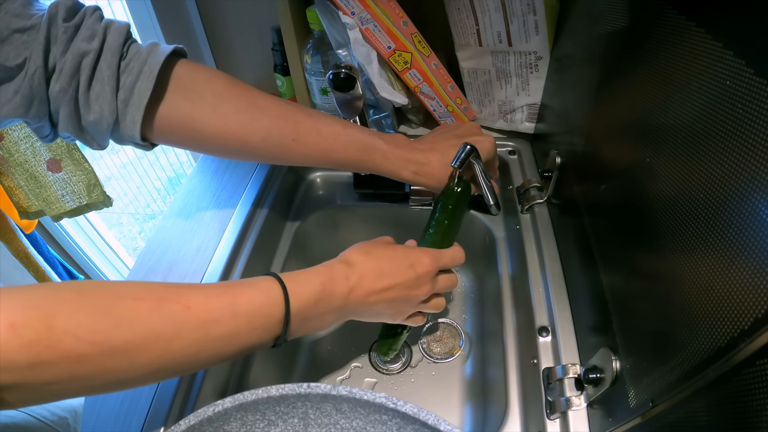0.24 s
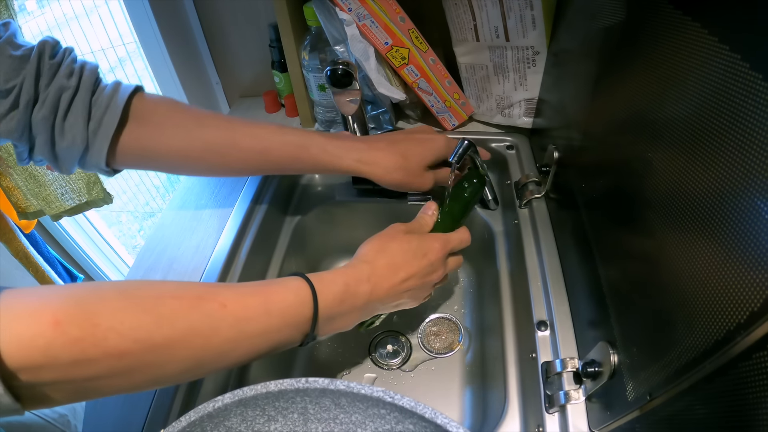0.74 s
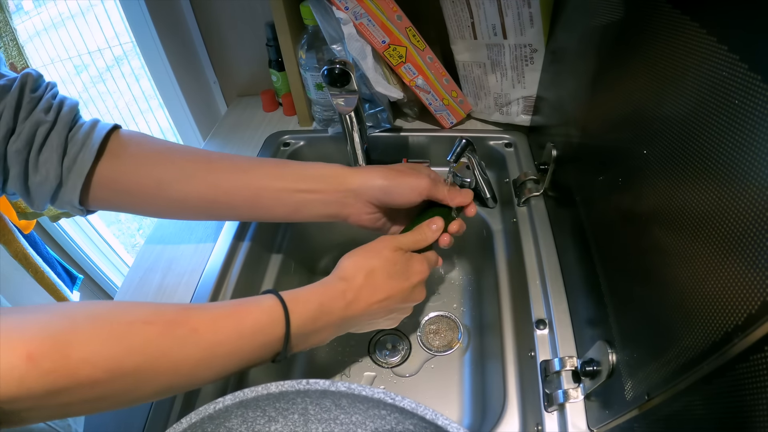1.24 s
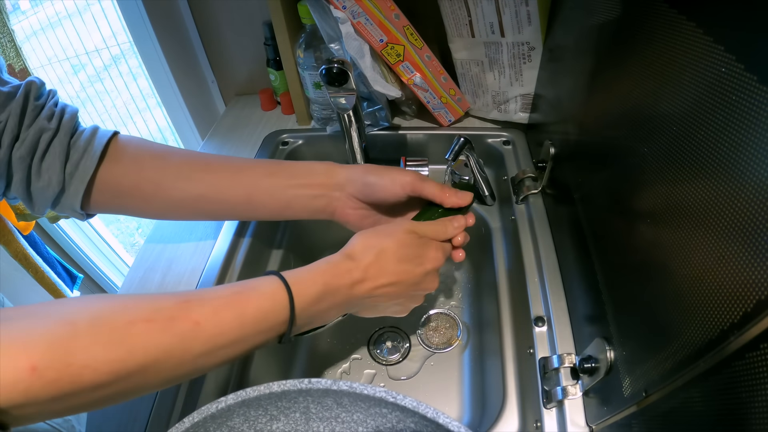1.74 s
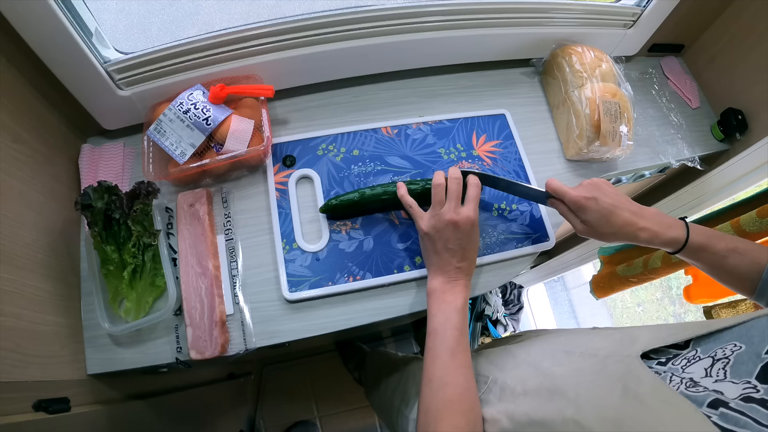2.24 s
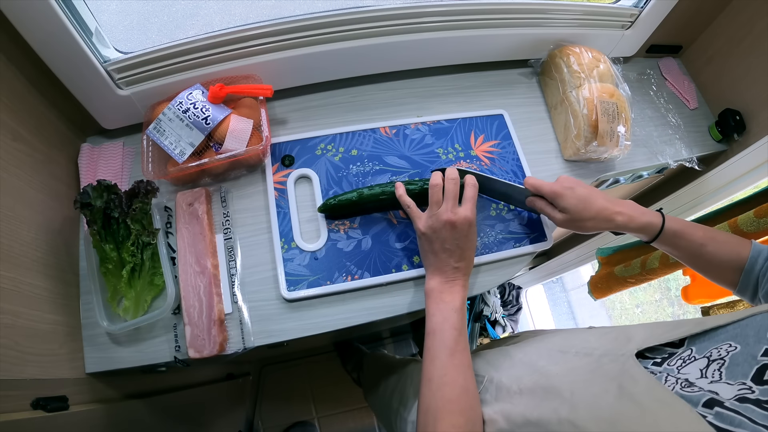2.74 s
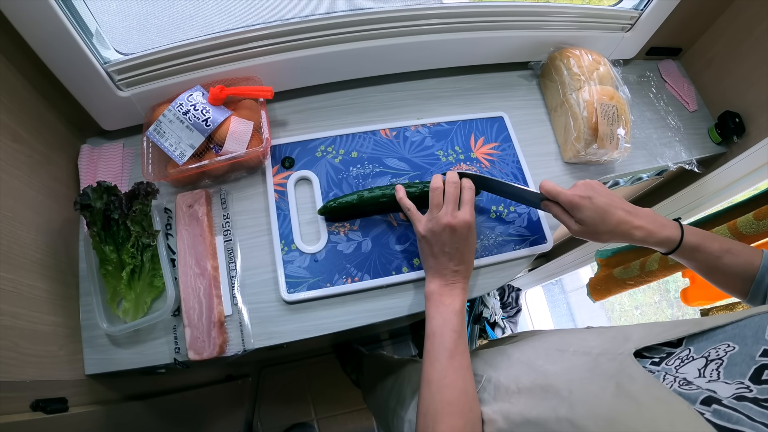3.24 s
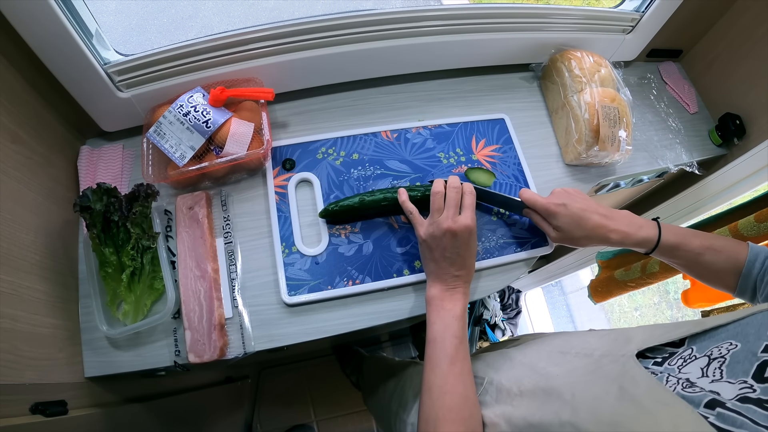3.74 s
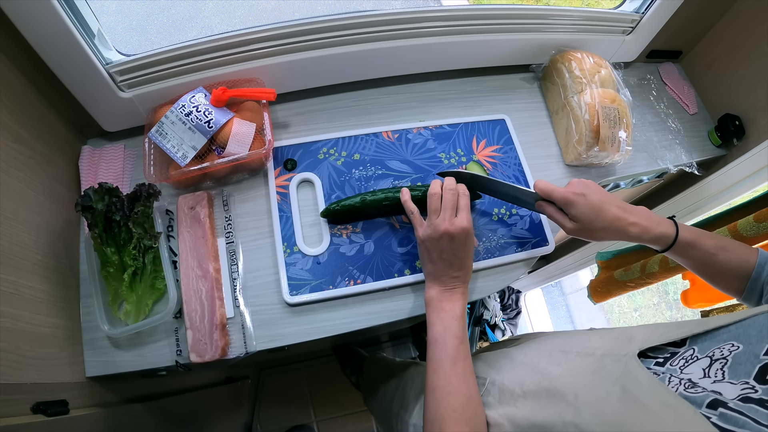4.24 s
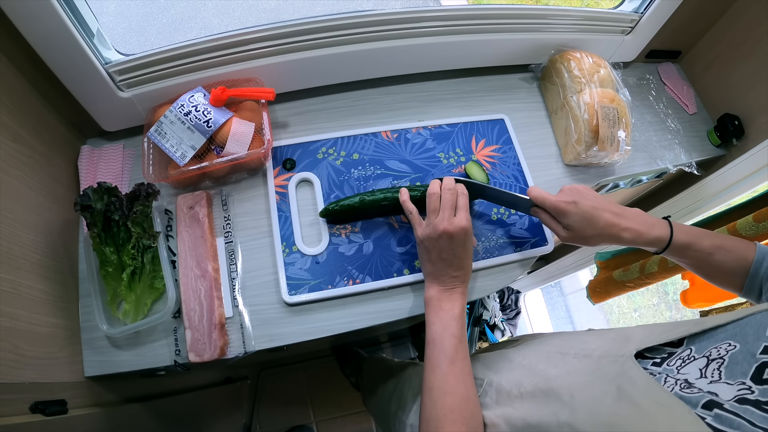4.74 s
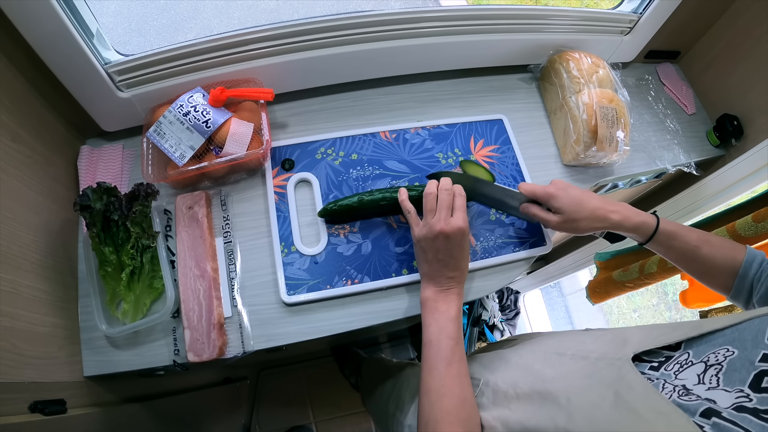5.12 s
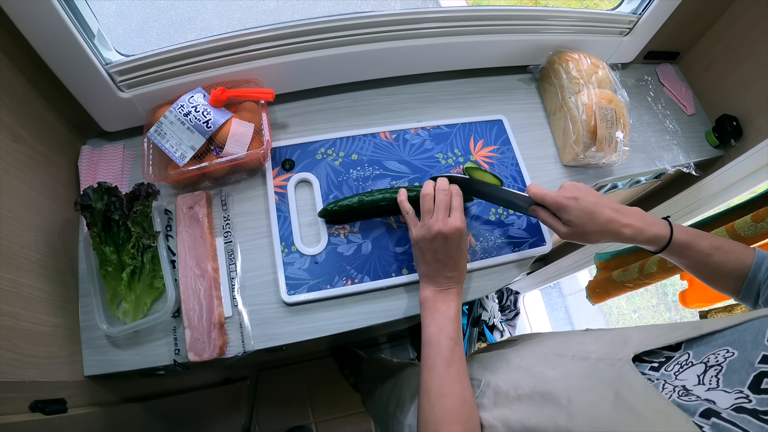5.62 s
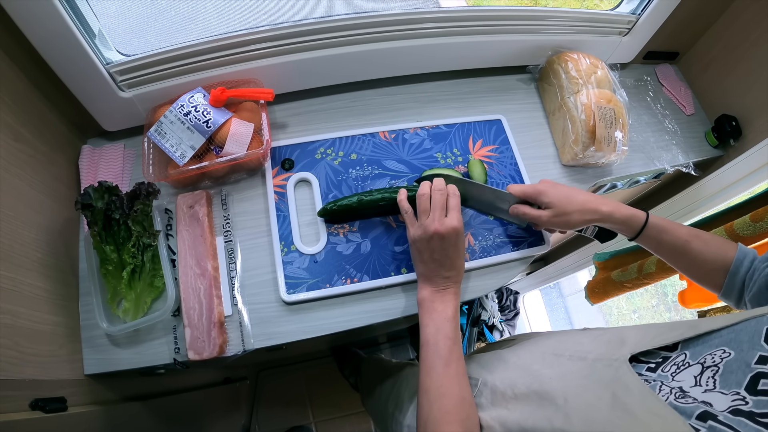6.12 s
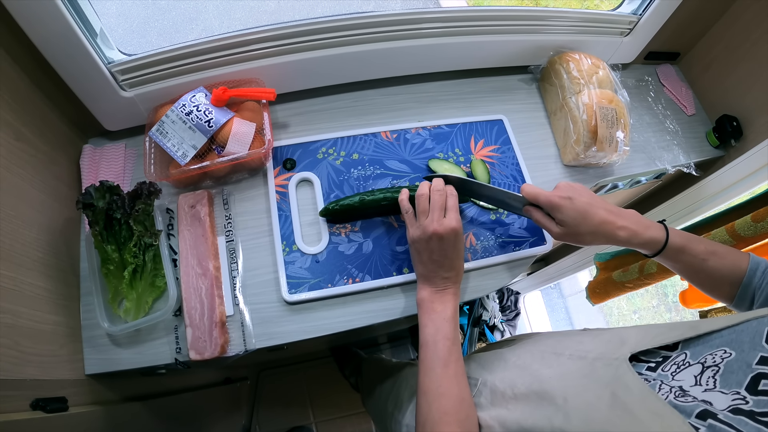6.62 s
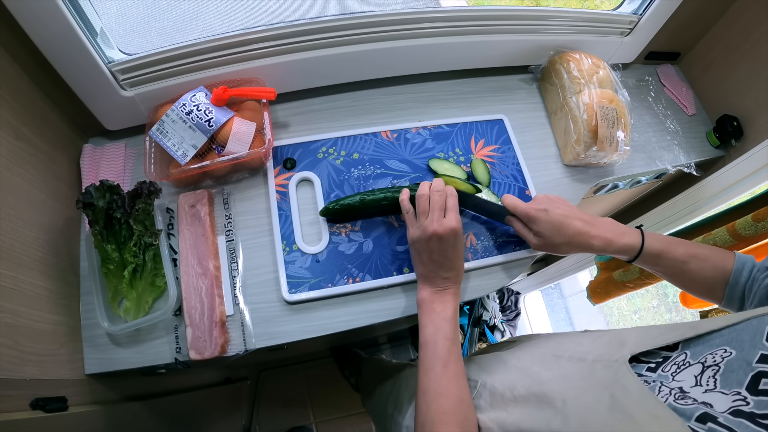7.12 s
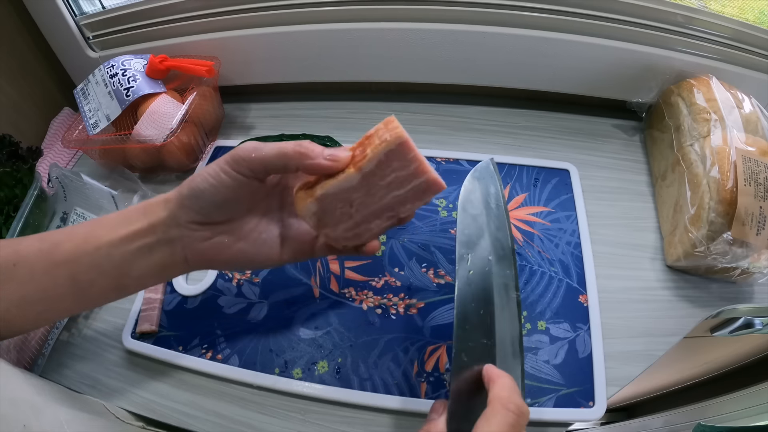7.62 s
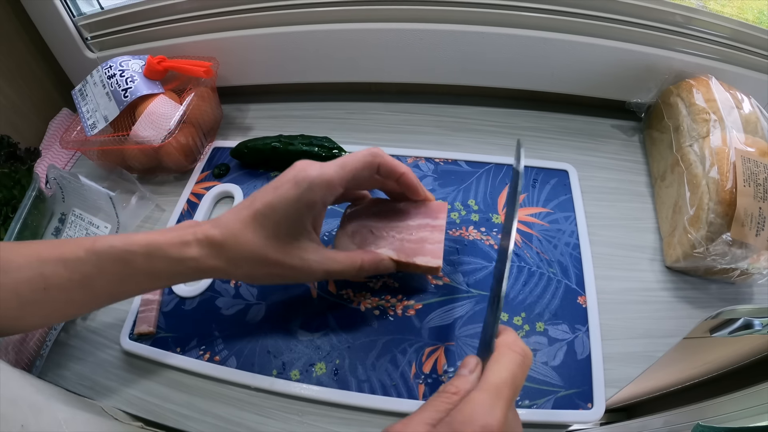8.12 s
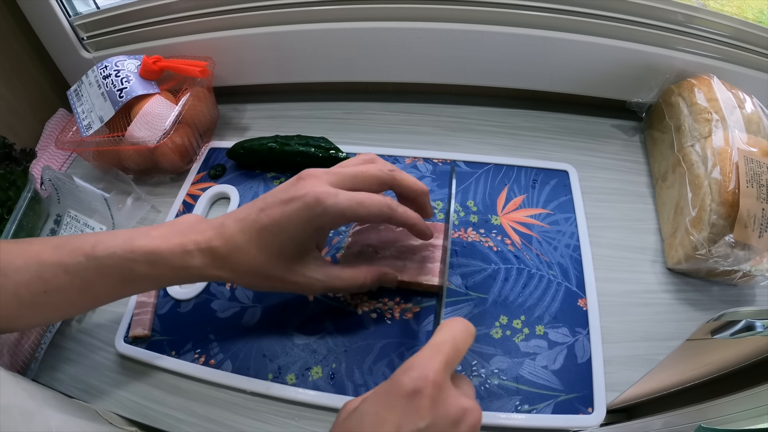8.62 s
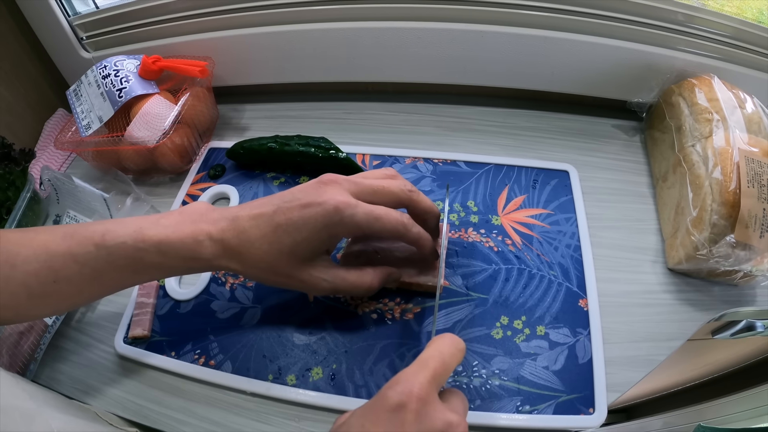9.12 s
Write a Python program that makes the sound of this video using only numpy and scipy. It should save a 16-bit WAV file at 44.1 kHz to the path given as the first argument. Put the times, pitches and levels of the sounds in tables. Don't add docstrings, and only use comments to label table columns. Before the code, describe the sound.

Running water hisses and drums in a metal basin over a steady pump hum, broken by hands and splats. It dies away as the first cut lands. Five close, dry chops follow about a second apart, each led by a juicy slide and tearing skin, with small knocks of falling slices between. Afterwards come soft handling and a block of meat set down, distant sparrows chirping and swelling street air, in a short, boxy room.

```python
import sys
import numpy as np
from scipy import signal
from scipy.fft import rfft, irfft, next_fast_len
from scipy.io import wavfile
from scipy.ndimage import uniform_filter1d, map_coordinates

SR = 44100
rng = np.random.default_rng(int(sys.argv[2]) if len(sys.argv) > 2 else 0)


def magnitude_from_level(level_db):
    exponent = np.asarray(level_db, float) / 20
    return 10 ** exponent


def int16_out(signal):
    q = np.round(np.clip(np.atleast_2d(signal).T, -1, 1) * 32767)
    wavfile.write(sys.argv[1], SR, q.astype(np.int16))


N = 412335

# frequency in Hz, density in dB per Hz.
RUMBLE_SPECTRUM = [(12, -31.5), (20, -3), (32, -1.5), (42, -4), (70, -1), (97, -14), (107, -12), (111, -12),
                   (120, 2.5), (160, -33), (260, -120)]
# frequency in Hz, density in dB per Hz.
HUM_SPECTRUM = [(59, -55.5), (100, -21), (121, -9.5), (140, -3.5), (157, 3), (167, -9.5), (199, -14),
                (372, -20), (409, -19.5), (600, -38), (800, -50), (1040, -75), (1760, -120)]
# frequency in Hz, density in dB per Hz.
AIR_SPECTRUM = [(350, -44), (600, -14), (911, -11.5), (1030, -4.5), (1230, -2), (1380, -4), (1500, -2.5),
                (1890, -9.5), (2900, -17.5), (3600, -13.5), (7400, -16), (8500, -24.5), (11900, -32),
                (13500, -46), (15000, -50.5)]
# frequency in Hz, side minus mid in dB.
SIDE_SPREAD = [(60, -22), (110, -38.5), (200, -18.5), (380, -18), (700, -11), (1290, -9), (2380, -4.5),
               (4400, -8.5), (8120, -9), (15000, -10.5)]
# time in seconds, hiss in dB, low drone in dB.
BACKGROUND_COURSE = [(0, -2, -4.5), (3.3, -1, -4), (3.7, -1, 8.5), (4.2, -1.5, -0.5), (5.2, -3, -6), (5.6, 2, -3),
                     (6.1, 4.5, 5), (6.4, -1, -5), (6.8, 2.5, 1), (7.3, 3, -2), (7.8, 2, -6), (8.25, 9.5, 8.5),
                     (8.55, 8, 10.5), (8.9, 9, 5.5), (9.4, 8.5, 4)]
RUMBLE_DB, HUM_DB, AIR_DB = -52.5, -53.5, -79.5
RUMBLE_FOLLOWS, HUM_FOLLOWS = 0.27, 0.37
# frequency in Hz, t60 in seconds.
WALL_T60 = [(100, 0.12), (400, 0.064), (1500, 0.047), (5000, 0.11), (12000, 0.056)]

# start in seconds, level in dB, centre in Hz.
CHEEPS = [
    (3.22, -61, 4197),
    (4.531, -58, 4290),
    (5.678, -60.5, 4300),
    (7.642, -60, 4270),
]
# start in seconds, level in dB, centre in Hz.
CHIPS = [(7.334, -69, 4250), (7.979, -67, 4470), (8.047, -65, 4350), (8.368, -68, 4300),
         (8.438, -65.5, 4100), (8.733, -71.5, 4250), (8.792, -68, 4170), (8.861, -62, 4230)]
# start in seconds, level in dB, centre in Hz.
TRILL = [(7.835, -73.5, 4920), (7.853, -74, 4800), (7.885, -66, 4660), (7.902, -61, 4550),
         (7.922, -61.5, 4200)]
# length in seconds, fall in Hz.
CALL_SHAPES = [
    (0.081, 2000),
    (0.0298, 370),
    (0.018, 980),
]

# time in seconds, level in dB, stream broken by the hands in dB.
TAP_COURSE = [
    (0, 0.5, -1.5),
    (.33, 0.5, -2),
    (.65, 1, 3),
    (1.01, 1, -1),
    (1.35, 0.5, -0.8),
    (2.17, -0.5, 1.1),
    (2.56, -1, 1),
    (2.76, -11, 1),
    (2.87, -16, -2),
    (3.0, -40, -2.5),
]
# frequency in Hz, density in dB per Hz.
SPRAY_SPECTRUM = [(590, -22.5), (1000, 3), (1270, -8.5), (1570, -2), (1970, -9.5), (2970, -8.5),
                  (4780, -6.5), (7600, -13), (8400, -19), (13200, -21), (14300, -46)]
# frequency in Hz, density in dB per Hz.
SPLASH_SPECTRUM = [(120, -38), (200, 2.5), (232, -18), (285, -4.5), (344, -14.5), (436, -6), (549, -11.5),
                   (712, -23.5), (806, -26), (820, -13.5), (1070, -50.5), (1800, -120)]
# centre in Hz, width in Hz, level in dB.
STEEL_MODES = [(1517, 43, -3.5), (3170, 510, -1), (3790, 83, -4.5), (4120, 170, -6), (4870, 210, -15.5),
               (5560, 74, -6), (6160, 79, -7), (7700, 74, -10)]
PUMP_HZ = 172.3
PUMP_DB, SHAKE_DB, BASIN_DB, SPLASH_DB, SPRAY_DB = -40, -47.5, -43, -50.5, -59
BASIN_CHURNS, SPRAY_CHURNS = 2.2, 0.6
BASIN_FADES, SPRAY_FADES = 0.6, 0.94

# start in seconds, peak in dB, knuckle in dB.
THUMPS = [(0.048, -27.5, -39), (0.604, -30, -21), (0.714, -20, -16), (0.972, -17.5, -12.5),
          (1.369, -16.5, -25), (1.409, -27.5, 6), (1.903, -20, -32), (2.165, -24, -17)]
# start in seconds, peak in dB, brightness in dB.
SLAPS = [(0.4693, -36.5, 8), (0.5064, -46, -2), (0.6487, -42, -8.5), (0.6717, -34, 4), (0.7238, -34, 2),
         (0.7393, -16, 0), (0.971, -50.5, -9), (2.168, -66, -9)]
# start in seconds, peak in dB, brightness in dB.
SMACKS = [(0.707, -35, -8), (1.0075, -14, -5), (1.2104, -39, 4), (1.382, -38, 7), (1.4106, -35, 11.5),
          (1.6486, -18, -1), (2.4477, -28, -9), (2.5262, -33, 1.5)]
# body in dB, fizz in dB, t60 in seconds.
WET_CONTACTS = [
    (10, -14.5, 0.06),
    (-15.5, -22, .065),
]
# start in seconds, peak in dB, centre in Hz.
SPITS = [(.138, -46, 5460), (.193, -45, 5400), (.418, -54.5, 11500), (0.4509, -42.5, 7700),
         (0.46, -51.5, 11510), (.635, -54, 10500), (.672, -51.5, 9000), (0.9237, -40.5, 6940),
         (.978, -51.5, 9600), (.989, -53, 11910), (1.281, -40.5, 5660), (1.295, -54, 11980),
         (1.312, -52, 9800), (1.3302, -44, 5070), (1.413, -44.5, 10500), (1.4606, -44, 5800),
         (1.5235, -47, 7000), (1.6291, -35, 6460), (1.63, -48.5, 12000), (1.8259, -49, 8000),
         (1.884, -41.5, 4100), (2.0984, -42, 6700), (2.244, -52.5, 11470), (2.279, -48, 10500),
         (2.3065, -28.5, 6940), (2.3063, -43, 11560), (2.3476, -43.5, 5820), (2.389, -54.5, 11000),
         (2.4283, -43, 7360), (2.43, -50.5, 10980), (2.725, -32.5, 6200), (2.7251, -45.5, 11040),
         (2.7707, -48.5, 9700), (2.813, -59.5, 12000), (2.826, -59.5, 8000)]
THUMP_T60, KNUCKLE_HZ = 0.14, 389

# start in seconds, thud peak in dB, hardness in dB,
# wetness in dB, knock in Hz.
KNOCKS = [(3.217, -46.5, -14, 14, 910), (3.849, -32.5, -2.5, 0, 652), (3.876, -29, 1.5, -3, 810),
          (3.923, -27, -1.5, -11, 745), (3.98, -31, -18, -2, 700), (4.008, -41, -13, 1, 600),
          (4.024, -37, -17, 9, 600), (4.125, -54, -12, -7, 700), (4.435, -50, -6.5, 15, 900),
          (5.527, -42, -28, -2, 800), (5.541, -35.5, -13, -8, 802), (6.045, -22.5, -6, 1.5, 920),
          (6.073, -29, -7, -9, 600), (6.084, -26.5, 6.5, 5, 1120), (6.102, -29, -4.5, 5, 1900),
          (6.129, -37.5, 8.5, -2, 1110), (6.148, -33, 0, 7, 850), (6.167, -28, 10, 12, 1040),
          (6.187, -36, -7, 0, 600), (6.21, -38, -10, 12, 880), (6.223, -36, 5, 1, 950),
          (6.239, -36.5, -5, -1, 893), (6.503, -49, -19, 7, 1400), (7.18, -40.5, -11, -6, 596),
          (7.408, -34.5, -2, 12, 900), (7.442, -33, -4, 19.5, 953), (7.488, -47.5, -6.5, 17, 900),
          (7.503, -37.5, 3.5, 13, 1310), (7.648, -40.5, -20, 0, 912), (8.325, -39, -11.5, 6, 1296),
          (8.343, -41, -19, 7, 595)]
# start in seconds, peak in dB, centre in Hz.
PEEL_TICKS = [(4.3934, -59.5, 5630), (4.464, -59, 3295), (5.091, -64, 6740), (5.175, -70, 3700),
              (5.178, -71, 6800), (5.595, -72, 5500), (6.109, -48, 6540), (6.44, -75, 5200),
              (6.499, -66, 5290), (6.5281, -64, 6250), (6.565, -63.5, 6770), (6.588, -56.5, 5930),
              (7.173, -49, 6800), (7.2022, -43.5, 4110), (7.203, -52.5, 7530), (7.614, -62.5, 3300),
              (7.614, -63, 7950), (7.6803, -71, 7600), (8.296, -65, 8600), (8.9301, -66, 7910)]
# centre in Hz, width in Hz, level in dB.
BLADE_MODES = [(3220, 160, 0.5), (3730, 200, 1.5), (5460, 150, -1), (6250, 180, -11), (7050, 200, -3),
               (7700, 170, -3), (9100, 230, -4), (11400, 250, 3)]
# start in seconds, length in seconds, level in dB,
# centre in Hz, width in octaves.
RUBS = [(3.959, 0.18, -55.5, 437, 0.67), (4.01, 0.067, -72, 3500, .5), (4.069, .04, -77, 3180, .4),
        (6.203, 0.069, -50.5, 800, 0.61), (6.562, 0.053, -69, 6500, .8), (6.615, 0.042, -77, 5440, .6),
        (7.253, 0.077, -76.5, 6880, 0.27), (7.291, 0.052, -71, 3010, .7), (8.039, 0.094, -72.5, 4940, 0.71),
        (8.042, 0.082, -67.5, 1170, 0.86), (8.299, 0.11, -56, 340, .5)]
EDGE_DB, EDGE_HARD, EDGE_WET, TICK_DB = -18.5, 0.39, 0.66, -36.5
PEEL_T60, PEEL_BODY_DB, PEEL_THINS_DB = 0.068, -2.5, 4

# entry in seconds, bite in seconds, level in dB,
# stall at the last skin in dB, body in dB.
SLIDES = [
    (2.55, 0.074, -52, 5.5, -2.5),
    (3.382, .13, -50.5, -17, 5.5),
    (4.735, 0.055, -48.5, -1.5, 3),
    (5.761, .055, -50, 2.5, 0),
    (6.841, 0.093, -46, 2.5, -1.5),
]
# frequency in Hz, density in dB per Hz.
FLESH_SPECTRUM = [(120, -34.5), (200, -4), (304, 4), (422, -7.5), (554, 4.5), (689, -10), (755, 2.5),
                  (1090, -15), (1210, -10), (1330, -18.5), (1940, -8), (2600, -19.5), (4570, -16),
                  (7480, -28), (12000, -35), (15500, -46)]
# frequency in Hz, density in dB per Hz.
SKIN_SPECTRUM = [(180, -40), (300, -10.5), (814, 0), (1370, -4.5), (2000, 1.5), (2440, -3.5), (4390, -7),
                 (5180, -18.5), (7180, -24), (8740, -45), (15000, -57)]
# time in seconds, peak in dB, skin crunch in dB, thud in dB.
CHOPS = [
    (2.676, -6, -14.5, -1),
    (3.7667, -2.5, -8, -4),
    (4.9367, -4, -8, -6.5),
    (5.9686, -5, -13.5, -10),
    (7.0617, -7, -16, -14),
]
# low-mid modes in dB, mid modes in dB, high modes in dB, click in dB,
# tear in seconds.
LANDINGS = [
    (1.5, -6, -3, -0.5, .024),
    (-5.5, -3, 3.5, -0.5, 0.032),
    (-1, -2.5, 1, -1.5, .024),
    (3, -0.5, 1, -2, 0.023),
    (1.5, -1, -1, 1.5, 0.025),
]
# centre in Hz, width in Hz, level in dB.
BOARD_MODES = [(266, 110, -3), (395, 43, -10), (520, 55, 1), (652, 110, -0.5), (734, 48, -1), (952, 130, 1),
               (1219, 51, -5.5), (1440, 260, -6), (1940, 170, -6.5), (2245, 150, -5), (2800, 80, -17),
               (3600, 230, -13.5), (4070, 82, -16), (4720, 670, -21.5)]
# frequency in Hz, t60 in seconds.
SMACK_T60 = [(100, 0.17), (260, 0.059), (700, 0.13), (1840, 0.054), (4850, 0.038), (12000, 0.032)]
ENTRY_DB, ENTRY_BODY_DB, SWELL_DB = -33.5, 9, 5
SLOWS_S, STALL_S, PUSH_S = 0.093, 0.03, 0.016

LEAD = 441


def unit(x):
    return x / np.sqrt(np.mean(x ** 2) + 1e-20)


def along(points, hz):
    f, v = np.transpose(points)
    return np.interp(np.log(hz + 1), np.log(f + 1), v)


def curves(rows):
    s, *cols = np.transpose(rows)
    return [np.interp(np.arange(N) / SR, s, c, right=-200) for c in cols]


def wobble(rate):
    knots = rng.standard_normal(int(N * rate / SR) + 4)
    return map_coordinates(knots, [np.arange(N) * rate / SR])


def filtered(x, response):
    m = next_fast_len(x.shape[-1] + 8192)
    return irfft(rfft(x, m) * response(np.fft.rfftfreq(m, 1 / SR)), m)[..., :x.shape[-1]]


def modes(table):
    def response(f):
        return sum((-1) ** k * magnitude_from_level(db) * 1j * f * w / (c * c - f * f + 1j * f * w)
                   for k, (c, w, db) in enumerate(table))
    return response


def struck(table, scatter_db):
    return modes([(c, w, db + scatter_db * rng.standard_normal()) for c, w, db in table])


def hump(centre_hz, octaves):
    return lambda f: np.exp(-.5 * (np.log2((f + 1) / centre_hz) / octaves) ** 2)


def steady(t60):
    return lambda f: t60 + 0 * f


def rush(spectrum, lo_hz, hi_hz, patchy_db, grainy_db, narrow_db=0):
    grains = rng.standard_normal((2, N)) * magnitude_from_level(grainy_db * wobble(900))
    z = signal.stft(grains, nperseg=512)[2]
    field = uniform_filter1d(rng.standard_normal(z.shape[1:]), size=6, axis=0)
    field = uniform_filter1d(field, size=10, axis=1)
    pair = signal.istft(z * magnitude_from_level(patchy_db * unit(field)), nperseg=512)[1][:, :N]

    def response(f):
        edges = np.sqrt((1 + (lo_hz / (f + 1)) ** 8) * (1 + (f / hi_hz) ** 8))
        band = magnitude_from_level(along(spectrum, f)) / edges
        return band * [np.ones(len(f)), magnitude_from_level(along(SIDE_SPREAD, f) - narrow_db)]
    mid, side = filtered(pair, response)
    return unit(np.array([mid + side, mid - side]))


def puff(colour, t60_of, side_db, rise=0.0044):
    hz, t, z = signal.stft(rng.standard_normal((2, SR // 8)), SR, nperseg=128)
    x = signal.istft(z * magnitude_from_level(-60 * t / t60_of(hz)[:, None]), SR, nperseg=128)[1][:, :SR // 8]
    x = x * (1 - np.exp(-np.arange(SR // 8) / SR / rise))
    x = np.pad(x, ((0, 0), (LEAD, 0)))
    mid, side = filtered(x, lambda f: colour(f) * magnitude_from_level(-7 / (1 + (8300 / (f + 1)) ** 12)))
    side = filtered(side, lambda f: magnitude_from_level(side_db) * (1 + (f / 9000) ** 2))
    return np.array([mid + side, mid - side]) / (2.23 * np.sqrt(np.mean(mid[LEAD:2 * LEAD] ** 2)))


def add(out, s, x):
    i = round(s * SR)
    out[..., i:i + x.shape[-1]] += x[..., :out.shape[-1] - i]


def add_burst(out, s, db, *args, **named):
    add(out, s - LEAD / SR, magnitude_from_level(db) * puff(*args, **named))


def room():
    hiss_db, drone_db = curves(BACKGROUND_COURSE)
    tap_db, _ = curves(TAP_COURSE)
    low_level = np.hypot(magnitude_from_level(RUMBLE_DB + RUMBLE_FOLLOWS * drone_db), magnitude_from_level(SHAKE_DB + tap_db))
    low = low_level * rush(RUMBLE_SPECTRUM, 4.6, 125, patchy_db=2.5, grainy_db=1.0)
    hum_level = magnitude_from_level(HUM_DB + HUM_FOLLOWS * drone_db + 1.4 * wobble(4.6))
    hum = hum_level * rush(HUM_SPECTRUM, 90, 1000, patchy_db=0.5, grainy_db=-1.0)
    air_level = magnitude_from_level(AIR_DB + hiss_db + wobble(4.3))
    return low + hum + air_level * rush(AIR_SPECTRUM, 600, 15500, patchy_db=1.5, grainy_db=0.5)


def sparrows():
    dry = np.zeros(N)
    for calls, (length, fall_hz) in zip((CHEEPS, CHIPS, TRILL), CALL_SHAPES):
        for s, db, centre_hz in calls:
            u = np.linspace(0, 1, int(length * SR))
            hoarse = unit(uniform_filter1d(rng.standard_normal(len(u)), size=30))
            hz = centre_hz + fall_hz * (.5 - u ** .85) + (140 + .07 * fall_hz) * hoarse
            turn = 2 * np.pi * np.cumsum(hz) / SR
            voices = np.sin(turn) + 0.5 * np.sin(1.11 * turn)
            flutter = 1 + .5 * np.sin(2 * np.pi * 70 * length * u)
            add(dry, s, magnitude_from_level(db) * np.sin(np.pi * u) ** 0.89 * flutter * voices)
    t = np.arange(SR // 3) / SR
    tail = filtered(rng.standard_normal((2, len(t))) * magnitude_from_level(-60 * t / 0.54), hump(3300, 0.24))
    tail = tail[0] + magnitude_from_level(-10.5) * tail[1] * [[1], [-1]]
    tail = tail / np.linalg.norm(tail[0])
    return dry + magnitude_from_level(-23) * signal.fftconvolve(dry[None], tail, axes=1)[:, :N]


def tap():
    tap_db, churn_db = curves(TAP_COURSE)
    basin_db = BASIN_DB + BASIN_FADES * tap_db + BASIN_CHURNS * churn_db
    splash_db = SPLASH_DB + tap_db + churn_db
    spray_db = SPRAY_DB + SPRAY_FADES * tap_db + SPRAY_CHURNS * churn_db
    turn = 2 * np.pi * np.cumsum(PUMP_HZ + .25 * wobble(4.0)) / SR
    vanes = np.sin(turn) + magnitude_from_level(-23.5) * np.sin(5 * turn)
    pump = magnitude_from_level(PUMP_DB + tap_db + 3.5 + wobble(7.5)) * vanes
    drum = unit(filtered(rng.standard_normal(N), lambda f: modes([(146, 26, 0)])(f) ** 2))
    drum = magnitude_from_level(basin_db - 1.5 + 2.1 * wobble(13.0)) * drum
    splash = magnitude_from_level(splash_db + wobble(11)) * rush(SPLASH_SPECTRUM, 120, 1100, patchy_db=1.5, grainy_db=3.5)
    fine = rush(SPRAY_SPECTRUM, 800, 14000, patchy_db=1.3, grainy_db=2.5)
    fine = unit(filtered(fine, lambda f: 1 + 0.75 * np.abs(modes(STEEL_MODES)(f))))
    return pump + drum + splash + magnitude_from_level(spray_db + 2.0 + 1.2 * wobble(27)) * fine


def droplets():
    draw = rng.random((300, 4))
    hz = 6000 * np.exp(1.1 * (draw[:, 1:2] - .5))
    t = np.arange(300) / SR
    level = magnitude_from_level(-57 - 4 * np.log(draw[:, 2:3] + .03) - 60 * t * hz / 18)
    pings = level * (1 - np.exp(-t / .0003)) * np.sin(2 * np.pi * hz * t)
    spots = (draw[:, :1] * 2.6 * SR).astype(int) + np.arange(300)
    lean = magnitude_from_level(2.6 * (draw[:, 3:] - 3.0))
    return np.array([np.bincount(spots.ravel(), (pings * g).ravel(), N) for g in (lean, 1 / lean)])


def washing():
    out = droplets()
    t = np.arange(SR // 3) / SR
    knuckle = modes([(KNUCKLE_HZ, 70, 0), (1.5 * KNUCKLE_HZ, 90, -5), (980, 90, -10)])
    for s, db, knock_db in THUMPS:
        swell = magnitude_from_level(db - 60 * t / THUMP_T60) * (1 - np.exp(-t / 0.013))
        add(out, s, swell * 2.04 * np.sin(2 * np.pi * 152 * t))
        add_burst(out, s, db + knock_db, knuckle, steady(0.56 * THUMP_T60), side_db=-20.0, rise=0.0016)
    for rows, (body_db, fizz_db, t60) in zip((SLAPS, SMACKS), WET_CONTACTS):
        for s, db, bright_db in rows:
            steel = struck(STEEL_MODES, scatter_db=3)
            bands = [(db - 10.0, 3400), (db + body_db - bright_db - 14, 1200),
                     (db + fizz_db + bright_db - 6, 6800)]
            for level_db, hz in bands:
                colour = lambda f: hump(hz, .42 + 150 / hz)(f) * (.8 + .7 * np.abs(steel(f)))
                add_burst(out, s, level_db, colour, steady(t60), side_db=-13, rise=.002)
    for s, db, hz in SPITS:
        colour = lambda f: (hump(hz, .13)(f) + 0.17 * hump(hz, .6)(f)) / (1 + (f / 13800) ** 20)
        add_burst(out, s, db - 5, colour, steady(0.026), side_db=-12, rise=.0008)
    return out


def clatter():
    out = np.zeros((2, N))
    for s, db, hard_db, wet_db, hz in KNOCKS:
        board = struck(BOARD_MODES, scatter_db=2)
        edge_db = db + EDGE_DB + EDGE_HARD * hard_db + EDGE_WET * wet_db
        layers = [
            (db, lambda f: (board(f) + 0.49) * hump(330, .45)(f), .085, -24, .004),
            (db + hard_db - 2, lambda f: (board(f) + 0.38) * hump(hz, .4)(f), .055, -22, .0005),
            (edge_db, lambda f: (board(f) + 0.36) * hump(2400, 0.7)(f), .05, -17, .001),
            (db + TICK_DB + wet_db, hump(5200, 0.5), .04, -12, .0012)]
        touch = np.pad(np.hanning(21), (40, SR // 10))
        ring = filtered(touch, lambda f: board(f) * modes([(hz, .8 * hz, 0)])(f))
        add(out, s, magnitude_from_level(db + hard_db + 11.5) * ring)
        for level_db, colour, t60, side_db, rise in layers:
            add_burst(out, s, level_db, colour, steady(t60), side_db, rise)
    for s, db, hz in PEEL_TICKS:
        blade = struck(BLADE_MODES, scatter_db=3)
        body_db = db + PEEL_BODY_DB - PEEL_THINS_DB * np.log2(hz / 4000)
        ringing = lambda f: hump(hz, 0.42)(f) * (.5 + np.abs(blade(f)))
        for level_db, colour in [(db, ringing), (body_db, hump(1500, 0.81))]:
            add_burst(out, s, level_db, colour, steady(PEEL_T60), side_db=-13.5, rise=0.00093)
    for s, length, db, hz, octaves in RUBS:
        catches = np.repeat(rng.standard_normal(SR // 4), 150)[:SR // 4]
        grit = rng.standard_normal((2, SR // 4)) * magnitude_from_level(3 * catches)
        stroke = np.sin(np.pi * np.clip(np.arange(SR // 4) / SR / length, 0, 1) ** .7)
        mid, side = unit(filtered(grit, hump(hz, octaves))) * stroke
        add(out, s, magnitude_from_level(db) * (mid + magnitude_from_level(-15.5) * side * [[1], [-1]]))
    return out


def slicing():
    rasp = rush(FLESH_SPECTRUM, 980, 15600, patchy_db=3.5, grainy_db=1, narrow_db=14.5)
    body = rush(FLESH_SPECTRUM, 150, 1000, patchy_db=-1.0, grainy_db=0, narrow_db=16.0)
    tear = rush(SKIN_SPECTRUM, 200, 15000, patchy_db=5.0, grainy_db=1, narrow_db=9.5)
    t, out = np.arange(N) / SR, np.zeros((2, N))
    for slide, (s, db, crunch_db, _), (*_, tear_s) in zip(SLIDES, CHOPS, LANDINGS):
        entry, bite, cut_db, stall_db, body_db = slide
        stall = s - STALL_S
        times = [entry - .02, entry, entry + bite, s - SLOWS_S, stall, stall + PUSH_S, s, s + 0.023]
        times = np.maximum.accumulate(times)
        shape_db = np.interp(t, times, [-60, ENTRY_DB, 0, 0, stall_db, SWELL_DB, SWELL_DB, -60])
        body_now_db = body_db + np.interp(t, times[1:3], [ENTRY_BODY_DB, 0])
        out += magnitude_from_level(cut_db + shape_db) * (rasp + magnitude_from_level(body_now_db) * body)
        growth_db = np.where(t < s, -30 * (np.abs(s - t) / tear_s) ** 1.8, -60 * (t - s) / 0.069)
        out += magnitude_from_level(db + crunch_db - 6.5 + growth_db) * tear
    return out


def chops():
    out, t = np.zeros((2, N)), np.arange(SR // 5) / SR

    def thud(db, hz, t60, rise):
        return magnitude_from_level(db - 60 * t / t60) * (1 - np.exp(-t / rise)) * np.sin(2 * np.pi * hz * t)
    for (s, db, _, thud_db), (low_db, mid_db, high_db, click_db, _) in zip(CHOPS, LANDINGS):
        place = [(300, 0), (560, low_db), (1000, mid_db), (2200, high_db)]
        board = modes([(c, w, level + along(place, c)) for c, w, level in BOARD_MODES])
        snap = modes([(850, 440, click_db - 7), (1980, 900, click_db - 8.5),
                      (4000, 900, click_db - 14.5), (179.0, 48, -5.3)])
        blows = np.zeros(SR // 5)
        for delay, loss_db in [(.0004, 7), (.0035, -6.5)]:
            add(blows, delay, magnitude_from_level(db + loss_db + 13) * np.hanning(9))
        add(out, s, filtered(blows, lambda f: (snap(f) - .7 * board(f)) / (1 + 1j * f / 6000) ** 3))
        colour = lambda f: (board(f) + 0.12) / (1 + (f / 5500) ** 4)
        add_burst(out, s, db + low_db / 2 - 12.5, colour, lambda f: along(SMACK_T60, f),
                  side_db=-23.5, rise=0.0021)
        add(out, s + 0.0044, thud(db + thud_db, 268, 0.045, 0.00072))
        add(out, s, thud(db - 27, 78, 0.13, 0.0022))
        add(out, s, thud(db - 27, 135, 0.24, 0.004))
    return out


def kitchen(x):
    hz, t, z = signal.stft(rng.standard_normal((2, SR // 4)), SR, nperseg=256)
    mid, side = signal.istft(z * magnitude_from_level(-60 * t / along(WALL_T60, hz)[:, None]), SR, nperseg=256)[1]
    tail = np.array([mid + magnitude_from_level(-18.0) * side, mid - magnitude_from_level(-16.5) * side]) / np.linalg.norm(mid)
    late = np.pad(x, ((0, 0), (150, 0)))
    return x + magnitude_from_level(-14.5) * signal.fftconvolve(late, tail, axes=1)[:, :N]


def scene():
    return room() + sparrows() + tap() + kitchen(washing() + clatter() + slicing() + chops())


def low_pass(x):
    return signal.sosfilt(signal.butter(12, 15630, fs=SR, output="sos"), x)


def record(dry):
    rounded = dry / (1 + np.abs(dry / .93) ** 6) ** (1 / 6)

    def ports(f):
        lag_samples = np.array([[1], [-1]]) * .5 / (1 + f / 2000)
        return np.exp(-1j * np.pi * f * lag_samples / SR) * (f < 15600)
    mix = filtered(rounded, ports) * magnitude_from_level([[.1], [-.1]])
    return low_pass(mix)


dry = scene()
out = record(dry)
int16_out(out)
```